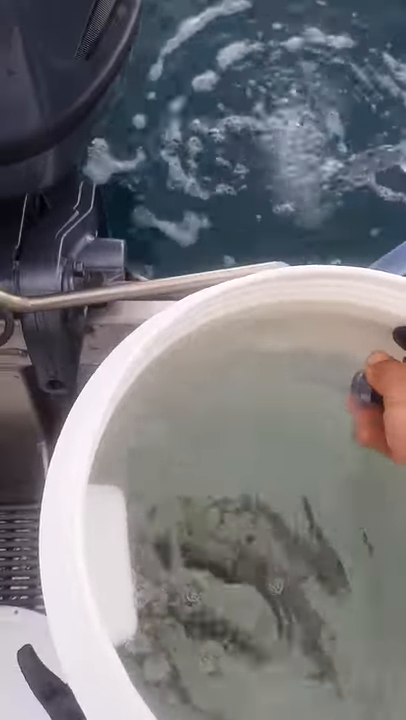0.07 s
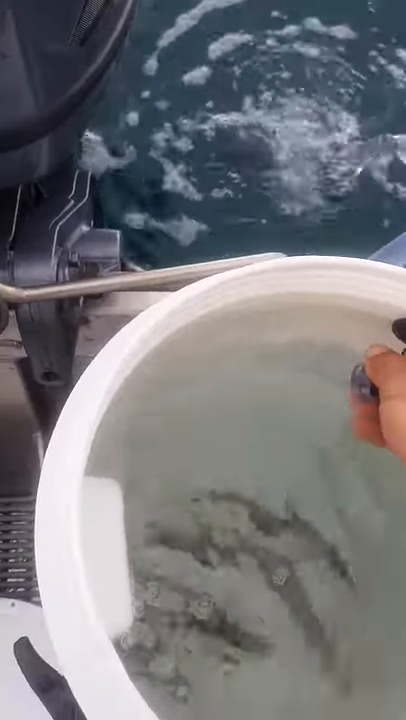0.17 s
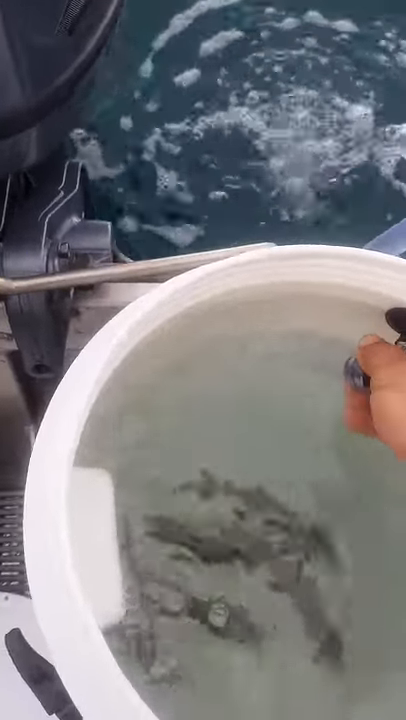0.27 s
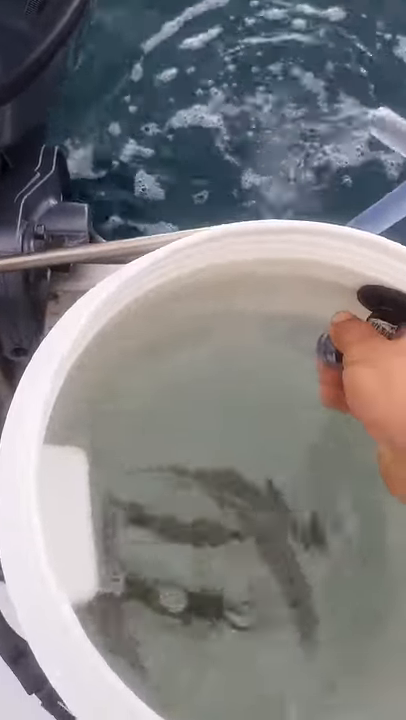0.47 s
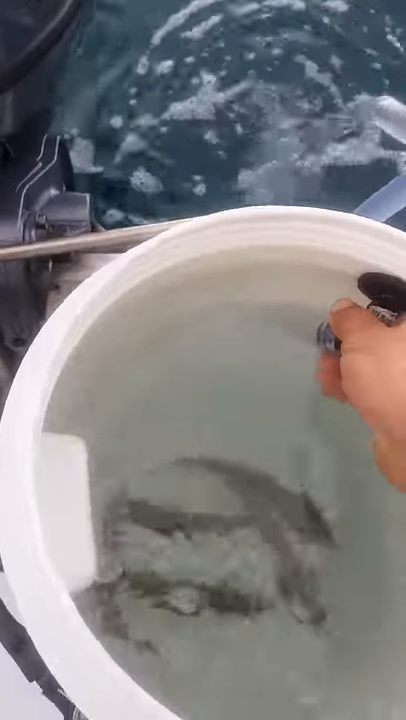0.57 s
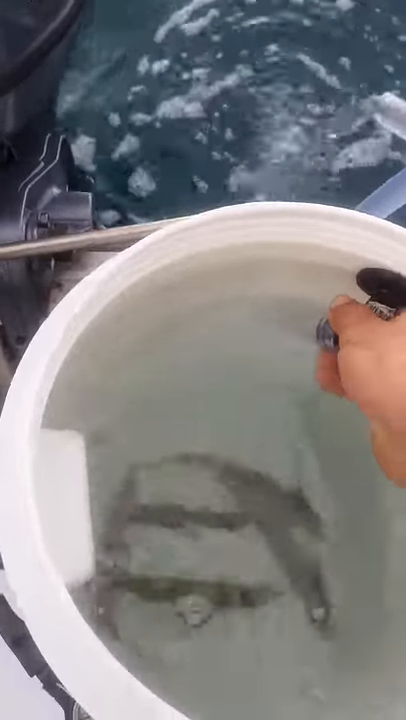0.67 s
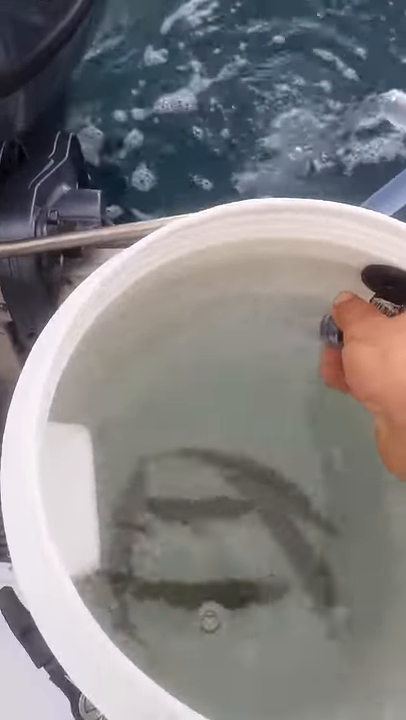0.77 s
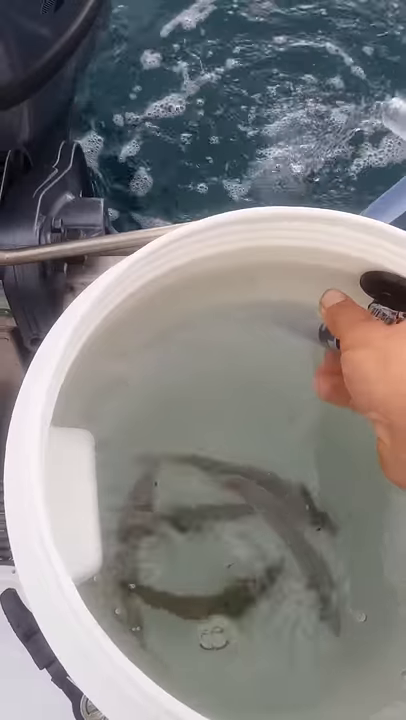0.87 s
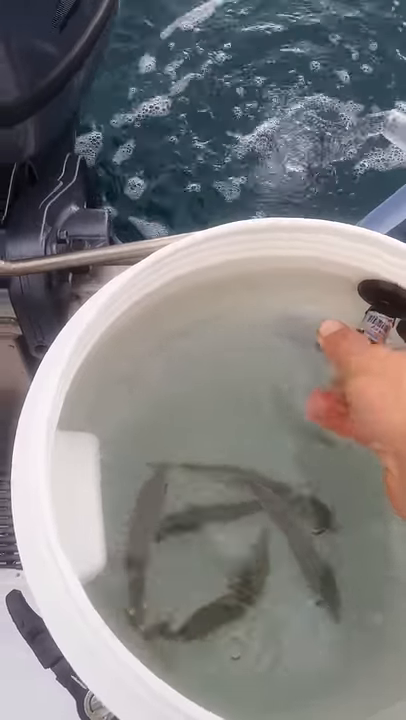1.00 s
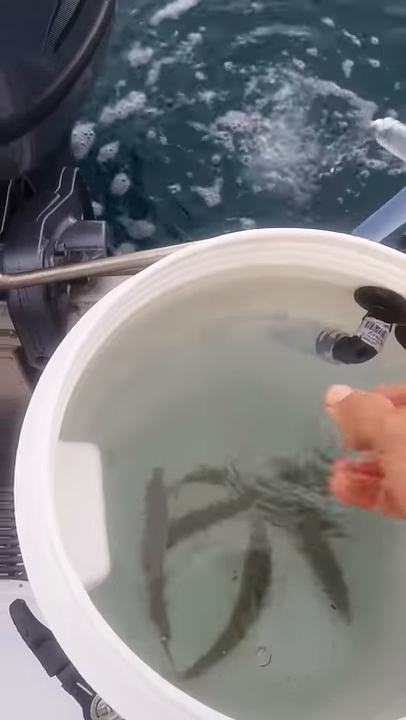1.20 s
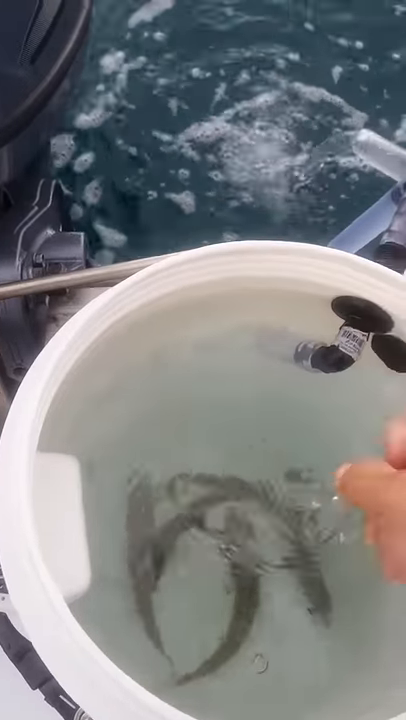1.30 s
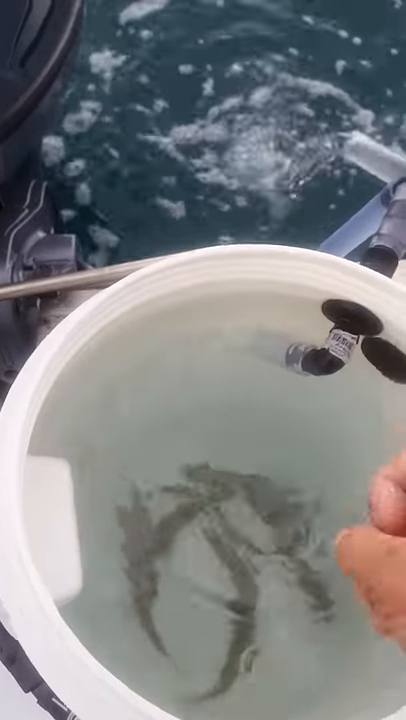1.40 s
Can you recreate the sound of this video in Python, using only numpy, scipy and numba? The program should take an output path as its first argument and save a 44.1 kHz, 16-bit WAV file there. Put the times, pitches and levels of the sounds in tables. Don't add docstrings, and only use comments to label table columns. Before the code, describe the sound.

Wind rumbles and pops hard on a small bare microphone outdoors, over a thin bubbly trickle into the sea; one bright gush of water slaps down and fades, then more wind thumps and a faint metallic squeak.

```python
import sys
import numpy as np
from scipy import signal
from scipy.io import wavfile
from scipy.ndimage import uniform_filter1d
from numba import njit

SR = 44100
rng = np.random.default_rng(int(sys.argv[2]) if len(sys.argv) > 2 else 0)


def wav_out(sig):
    wavfile.write(sys.argv[1], SR, np.round(np.clip(np.atleast_2d(sig).T, -1, 1) * 32767).astype(np.int16))


def linear_from_db(decibels):
    return 10 ** (np.asarray(decibels, float) / 20)


N = 63945
T = np.arange(N) / SR

# [t/s, rumble level/dB, eddy f/Hz, fine eddies re rumble level/dB]
GUSTS = [(0, -31, 118, -3.5), (.15, -35.5, 121.6, -5.5), (.185, -39.5, 124, -23.5), (.26, -18.5, 142.6, 1),
         (.37, -14.5, 107, -31), (.40, -25, 98, -29), (.45, -22.5, 166, -8.5), (.63, -31.5, 118, -7.5),
         (.735, -41.5, 97, 0.5), (.76, -26.5, 118.5, -8), (.845, -23, 108.5, -19), (.93, -16, 134, -17.5),
         (.985, -30.5, 109, -3.5), (1.05, -18.5, 136, -7), (1.1, -34.5, 104, -6), (1.143, -24, 110, -16),
         (1.19, -36.5, 88.3, -33), (1.45, -38.5, 95.4, -10)]
# [t/s, peak level/dB, f/Hz]
PUSH_POPS = [(.02, -24.5, 217), (.052, -22.5, 99), (.11, -27, 160), (.137, -25.5, 146), (.208, -20.5, 176),
             (0.2318, -18, 393), (.237, -19, 210), (.248, -0.5, 472), (0.2546, -5, 301), (0.266, -31, 910),
             (.2698, -2, 162), (.274, -16, 520), (0.282, -21.5, 520), (0.2879, -5.5, 300),
             (.293, -13.5, 650), (.262, -13, 330), (.307, -29, 500), (.297, -10, 230), (0.3021, -7.5, 184),
             (0.315, -14.5, 288), (.347, -21, 378), (.358, -24, 372), (0.965, -14, 74),
             (0.4172, -14.5, 169), (0.4687, -7, 198), (0.679, -18, 76), (0.759, -19, 250),
             (0.768, -14.5, 150), (.80, -33, 380), (.822, -31, 400), (.866, -15, 366), (.872, -15, 397),
             (0.882, -22, 120), (.897, -14, 149), (0.9055, -16, 344), (0.919, -16.5, 278), (0.923, -9, 372),
             (0.9369, -7, 150), (0.947, -15, 390), (.950, -9, 170), (1.008, -26, 300), (1.014, -18, 290),
             (1.035, -12.5, 168), (1.042, -8.5, 130), (1.050, -8, 300), (1.0572, -4, 127),
             (1.064, -12.5, 300), (1.137, -20.5, 370), (1.139, -11, 131), (1.24, -23.5, 107)]
# [t/s, peak level/dB, f/Hz]
PULL_POPS = [
    (.3816, -3, 376),
    (.3812, -12.5, 910),
    (.8784, -4, 178),
]
# [t/s, peak level/dB, f/Hz, ring length/cycles]
BUBBLES = [(0.01, -41, 975, 12), (.032, -43, 1034, 17), (0.073, -36.5, 1720, 8.5), (.131, -51, 5720, 33),
           (0.142, -39.5, 2220, 18), (.154, -39, 2970, 17), (0.182, -44, 3130, 14), (0.224, -39, 2740, 7.8),
           (.347, -53, 2480, 57), (.436, -29.5, 709, 24), (.505, -27.5, 1035, 20), (.543, -28, 1660, 13),
           (.557, -31.5, 1700, 12), (.535, -33, 1003, 14), (.556, -33, 980, 14), (.503, -38, 2650, 34),
           (.565, -42, 3850, 14), (.672, -41, 980, 9.1), (.722, -39, 856, 10.6), (.34, -40, 1260, 11),
           (1.384, -42, 2570, 9.4), (1.405, -44, 2540, 10), (0.634, -42, 2270, 11), (.775, -40, 4000, 13),
           (0.819, -39, 5860, 12), (0.825, -28.5, 2710, 5.7), (0.857, -48, 5170, 26),
           (0.431, -34, 1020, 36), (1.207, -46, 4540, 78), (1.016, -47.5, 4000, 26), (1.22, -51, 5380, 40),
           (1.241, -42.5, 1266, 13), (1.284, -47.5, 3430, 30), (1.311, -46, 1766, 41),
           (1.367, -35, 1820, 16), (1.383, -41.5, 1864, 19), (1.398, -42, 5260, 24), ]
# [t/s, peak level/dB, f/Hz, length/ms]
SPRAY = [(.01, -51, 6057, 17), (.155, -40, 6100, 5), (0.187, -43.5, 5200, 3.2), (.203, -46.5, 9100, 3.8),
         (0.266, -38.5, 6600, 3.9), (0.347, -39, 2670, 14.5), (0.419, -34, 4540, 11),
         (.479, -45.5, 9900, 8.4), (0.493, -37, 5700, 20), (0.556, -38, 6700, 5.9), (0.574, -43, 9600, 2),
         (.64, -45, 5500, 14), (0.665, -39.5, 9500, 2.9), (.680, -44, 8600, 1.8), (.765, -46, 5500, 6.9),
         (0.778, -40.5, 9500, 4.1), (0.844, -45.5, 10400, 3), (.9, -46, 4320, 14), (0.961, -44, 5000, 6.8),
         (1.188, -40.5, 4420, 3.8), (1.212, -46, 5200, 21), (1.04, -46, 4200, 4), (.466, -42, 8500, 5),
         (.127, -48, 9000, 2), (.965, -49.5, 8600, 2.4), (1.385, -49, 8000, 2), (1.4, -48, 9000, 2),
         (.31, -48, 5300, 12), (1.33, -37.5, 5560, 6.1), (1.331, -45.5, 9650, 3.6),
         (1.37, -39.5, 5500, 3.1), (1.44, -36, 3430, 6.7)]
# [t/s, level/dB]
FLOW_LEVEL = [(0, -48), (.06, -48.5), (.2, -53.5), (.33, -52.5), (.35, -50), (.4, -53.5), (.62, -50.5),
              (.72, -54), (.82, -50.5), (1., -54.5), (1.15, -55), (1.21, -52.5), (1.3, -51.5), (1.45, -50)]
# [f/Hz, level per Hz/dB]
TRICKLE_COLOUR = [(350, -4), (1000, -12), (1900, -14.5), (3500, -18), (5500, -22.5), (7200, -27.5),
                  (10000, -30.5), (16000, -71)]
# [f/Hz, level per Hz/dB]
GUSH_COLOUR = [(350, -5.5), (700, -16), (1000, -12.5), (1300, -19.5), (3500, -26.5), (5600, -30.5),
               (8000, -41), (12000, -47)]
# [t/s, f/Hz, level/dB]
SQUEAK_PATH = [
    (1.008, 5300, -75),
    (1.024, 5280, -54),
    (1.044, 5190, -49.5),
    (1.052, 5290, -60),
    (1.08, 5350, -68),
    (1.105, 5310, -63),
    (1.135, 5420, -63),
    (1.17, 5500, -63),
    (1.2, 5550, -77),
]

EDDY_CYCLES, EDDY_SPREAD_OCT, EDDY_SCATTER_DB = 0.68, 0.46, 3
POP_CYCLES, POP_LEAN_RAD = .43, .2
CRACKLE_DB, CRACKLE_S, CRACKLE_PITCH = -22, .011, 1.92
DROP_GLIDE = .025
SPRAY_Q, SPRAY_WIDEST_HZ = 2.6, 2700
FIZZ_SCATTER_DB, FIZZ_CYCLES, WASH_DB = 3, 3.8, 2
GUSH_S, GUSH_DB, GUSH_RISE_S, GUSH_HOLD_S = 0.4145, -33, 0.0057, 0.077
GUSH_T60_LOW_S, GUSH_T60_HIGH_S = 0.9, 0.17
SLAP_DB, SLAP_S = 5.5, 0.014
BOAT_HZ, BOAT_WIDTH_HZ, BOAT_DB = 5500, 2220, -7
HISS_DB, MIC_LOW_HZ, MIC_TOP_HZ = -66, 53, 15800
DUCK_ABOVE_DB, DUCK_SLOPE = -18, .3


def level(x, db):
    return x * linear_from_db(db) / np.sqrt(np.mean(x ** 2))


def curve(rows, col):
    rows = np.array(rows)
    return np.interp(T, rows[:, 0], rows[:, col])


def shape(rows, hz):
    rows = np.array(rows)
    return np.interp(np.log(hz), np.log(rows[:, 0]), rows[:, 1])


def band(x, hz, width_hz):
    b, a = signal.iirpeak(min(hz, .4 * SR), hz / width_hz, fs=SR)
    return signal.lfilter(b, a, signal.lfilter(b, a, x))


def walk(rate):
    hold = int(SR / rate)
    steps = np.repeat(rng.standard_normal(N // hold + 1), hold)
    return 1.6 * uniform_filter1d(uniform_filter1d(steps, hold), hold)[:N]


@njit
def swirls(at, hz, cycles, size, phase, n, sr):
    out = np.zeros(n)
    for k in range(len(at)):
        span = cycles[k] * sr / hz[k]
        for i in range(max(int(at[k] - 6 * span), 0), min(int(at[k] + 6 * span), n)):
            d = i - at[k]
            bell = (1 - (d / span / 6) ** 2) ** 2 / (1 + 2 * (d / span) ** 2) ** 1.25
            out[i] += size[k] * bell * np.cos(2 * np.pi * hz[k] * d / sr + phase[k])
    return out


def wind(count=260):
    when, big_turn, fine_turn, pitch, loudness = rng.random((count, 5)).T
    at = (np.arange(count) + when) / count * (N - 1)
    hz = curve(GUSTS, 2)[at.astype(int)] * 2 ** (EDDY_SPREAD_OCT * 3 * (pitch - .5))
    size = linear_from_db(EDDY_SCATTER_DB * 3.1 * (loudness - .5))
    one = np.ones(count)
    big = swirls(at, hz, EDDY_CYCLES * one, size, 2 * np.pi * big_turn, N, SR)
    big = big / (0.098 + np.sqrt(uniform_filter1d(level(big, 0) ** 2, size=900)))
    fine = swirls(at, 2.035 * hz, 0.94 * one, size[::-1].copy(), 2 * np.pi * fine_turn, N, SR)
    return linear_from_db(curve(GUSTS, 1)) * (level(big, 0.077) + level(fine, 0) * linear_from_db(curve(GUSTS, 3)))


@njit
def rings(at, hz, cycles, size, glide, n, sr):
    out = np.zeros(n)
    for k in range(len(at)):
        span, phase = cycles[k] * sr / hz[k], 0.
        for j in range(min(int(2.5 * span), n - at[k])):
            u = j / span
            phase += 2 * np.pi * min(hz[k] * (1 + glide[k] * u) / sr, .45)
            out[at[k] + j] += size[k] * np.sin(phase) * np.exp(-2.3 * u) * (1 - np.exp(-8 * u)) ** 2
    return out


def water(colour, env_db, count, cycles, flick_db, scatter_db):
    out, swell = 0, walk(44.97)
    for hz in 350 * 2 ** np.arange(0, 5.3, 1 / 3):
        when, pitch, spread = rng.random((count, 3)).T
        burst = np.minimum(rng.exponential(size=count), 3)
        at = (when * N).astype(np.int64)
        bubble_hz = hz * 2 ** ((pitch - .5) / 3)
        length = cycles * (hz / 1500) ** 0.38 * (.5 + 2 * spread)
        fizz = rings(at, bubble_hz, length, linear_from_db(scatter_db * burst), .03 * spread, N, SR)
        wash = band(rng.standard_normal(N), hz, hz / 3)
        flicker = flick_db * (0.83 * swell + 0.92 * walk(40.05))
        db = shape(colour, hz) + 10 * np.log10(hz / 3000) + env_db(hz) + flicker
        out = out + linear_from_db(db) * (level(fizz, 0) + level(wash, WASH_DB))
    return out


def trickle():
    flow = curve(FLOW_LEVEL, 1) + 2.45
    return water(TRICKLE_COLOUR, lambda hz: flow, count=160, cycles=FIZZ_CYCLES,
                 flick_db=1.76, scatter_db=FIZZ_SCATTER_DB)


def drops():
    s, db, hz, cycles = np.array(BUBBLES, float).T
    glide = DROP_GLIDE * np.sqrt(cycles / 20)
    return rings((s * SR).astype(np.int64), hz, cycles, linear_from_db(db + 6.5), glide, N, SR)


def spray():
    out = 0
    for s, db, hz, ms in SPRAY:
        env = np.exp(-np.abs(T - s) * 1000 / np.where(T < s, ms / 3, ms))
        width_hz = min(hz / SPRAY_Q * np.sqrt(5 / ms), SPRAY_WIDEST_HZ)
        out = out + linear_from_db(db) * env * level(band(rng.standard_normal(N), hz, width_hz), -7.5)
    return out


def pops(count=8):
    s, db, hz = np.vstack([np.array(PUSH_POPS, float), np.array(PULL_POPS, float)]).T
    side = np.where(np.arange(len(s)) < len(PUSH_POPS), 1, -1)
    phase = side * np.pi / 2 + POP_LEAN_RAD * rng.standard_normal(len(s))
    thumps = swirls(s * SR, hz, POP_CYCLES * np.ones(len(s)), linear_from_db(db + 2.0), phase, N, SR)
    when, softer, pitch, turn = rng.random((len(s) * count, 4)).T
    small_s = np.repeat(s, count) + CRACKLE_S * 2 * (when - .4)
    small_db = np.repeat(db, count) + CRACKLE_DB - 9 * softer
    small_hz = CRACKLE_PITCH * np.repeat(np.sqrt(300 * hz), count) * 2 ** (pitch - .5)
    small_cycles = 1.11 * np.ones(len(small_s))
    return thumps + swirls(small_s * SR, small_hz, small_cycles, linear_from_db(small_db), 2 * np.pi * turn, N, SR)


def gush_db(hz):
    t60 = np.interp(np.log(hz), np.log([500, 8000]), [GUSH_T60_LOW_S, GUSH_T60_HIGH_S])
    since = T - GUSH_S
    rise_db = 20 * np.log10(np.clip(since / GUSH_RISE_S, 1e-4, 1))
    slap_db = SLAP_DB * min(hz / 2500, 1) * np.exp(-np.maximum(since, 0) / SLAP_S)
    fall_db = 60 * np.maximum(since - GUSH_HOLD_S, 0.32 * since) / t60
    return GUSH_DB + rise_db + slap_db - fall_db


def gush():
    splash = water(GUSH_COLOUR, gush_db, count=600, cycles=4.0, flick_db=1.5, scatter_db=0.0)
    soften = signal.butter(2, 8000, fs=SR, output="sos")
    return signal.sosfilt(soften, splash) * linear_from_db(7.5)


def squeak():
    on = (T > SQUEAK_PATH[0][0]) & (T < SQUEAK_PATH[-1][0])
    tone = np.sin(2 * np.pi * np.cumsum(curve(SQUEAK_PATH, 1)) / SR)
    return on * linear_from_db(curve(SQUEAK_PATH, 2)) * (1 + 0.53 * walk(150)) * tone


def scene():
    sea = trickle() + drops() + spray() + gush()
    boat = linear_from_db(BOAT_DB) * band(sea, BOAT_HZ, BOAT_WIDTH_HZ)
    return (wind() + sea + boat + pops() + squeak())[None]


def band_limit(x):
    return signal.sosfilt(signal.butter(12, 15850, fs=SR, output="sos"), x)


def record(dry):
    x = dry + linear_from_db(HISS_DB) * rng.standard_normal(dry.shape)
    x = signal.sosfilt(signal.butter(3, MIC_LOW_HZ, "high", fs=SR, output="sos"), x)
    loud = np.sqrt(uniform_filter1d(uniform_filter1d(x ** 2, size=700), size=300) + 1e-12)
    treble = signal.sosfiltfilt(signal.butter(2, 1500, "high", fs=SR, output="sos"), x)
    x = x - treble * (1 - np.minimum(linear_from_db(DUCK_ABOVE_DB) / loud, 1) ** DUCK_SLOPE)
    x = signal.sosfilt(signal.ellip(8, .2, 70, MIC_TOP_HZ, fs=SR, output="sos"), x)
    return band_limit(x)


dry = scene()
out = record(dry)
wav_out(out)
```